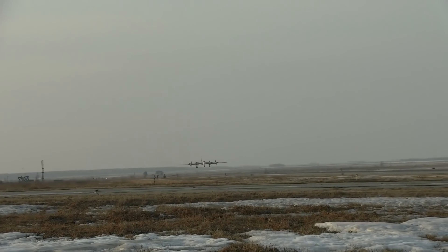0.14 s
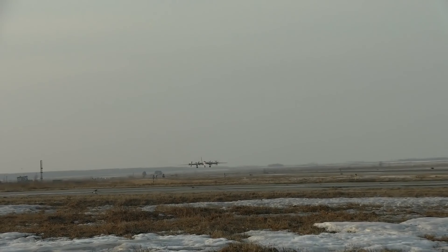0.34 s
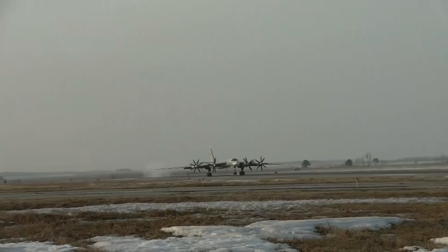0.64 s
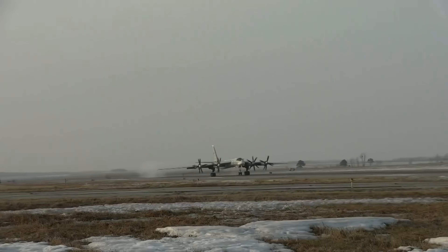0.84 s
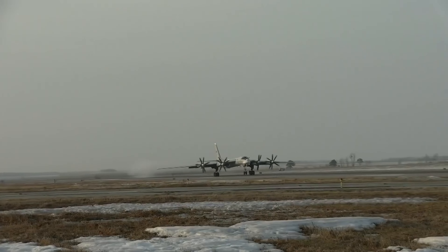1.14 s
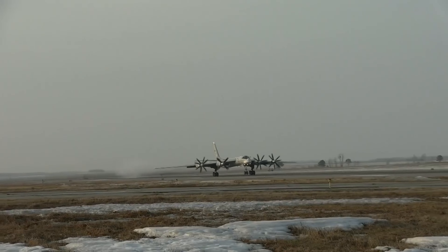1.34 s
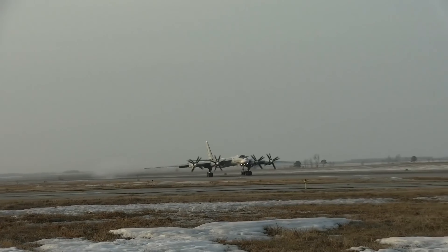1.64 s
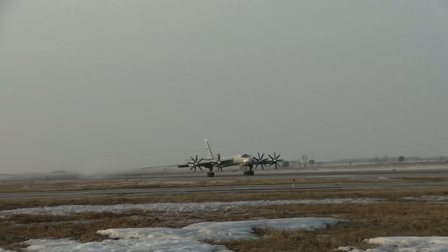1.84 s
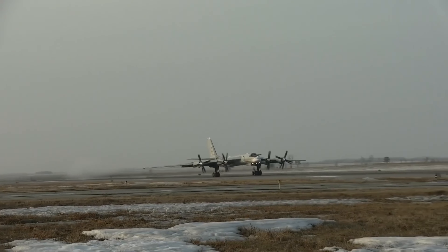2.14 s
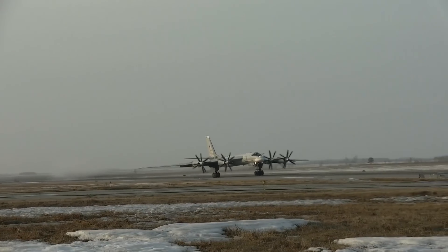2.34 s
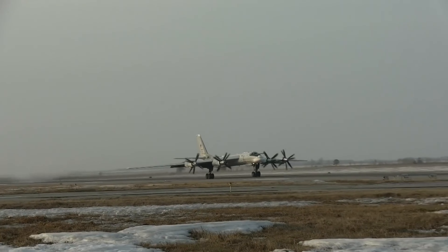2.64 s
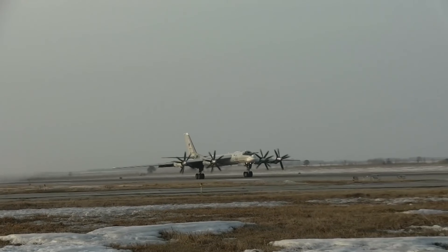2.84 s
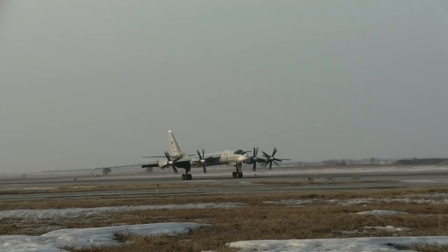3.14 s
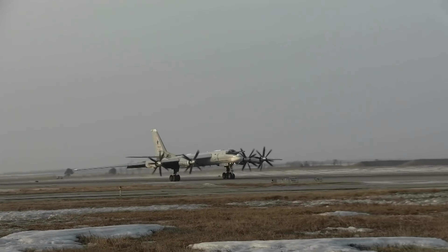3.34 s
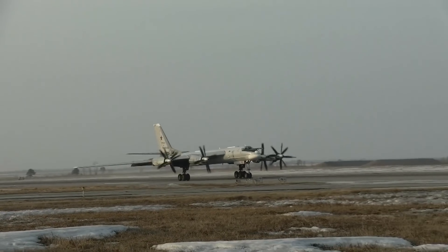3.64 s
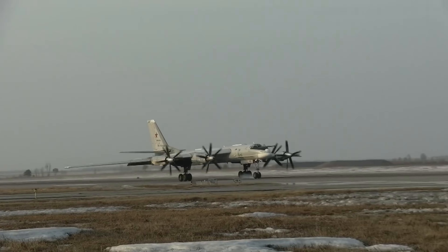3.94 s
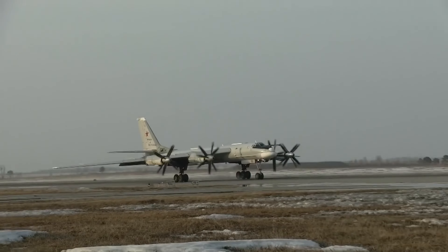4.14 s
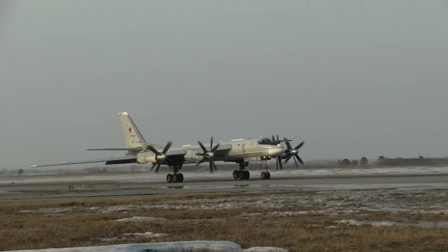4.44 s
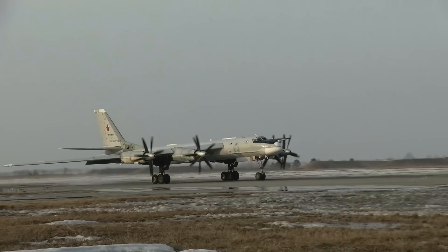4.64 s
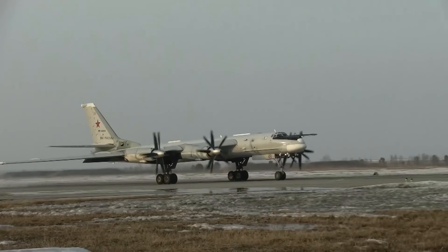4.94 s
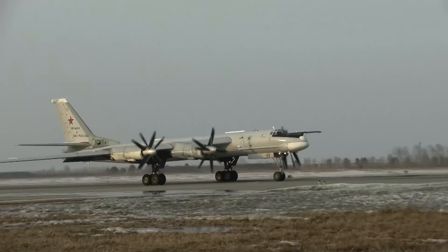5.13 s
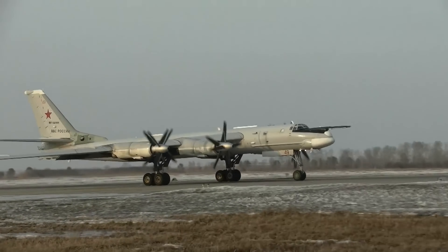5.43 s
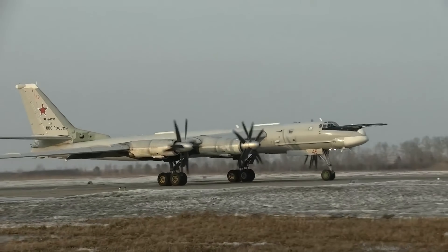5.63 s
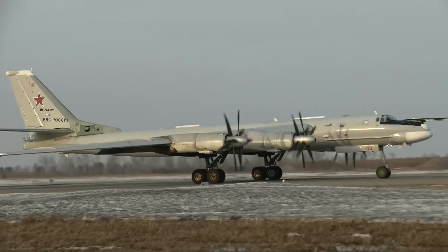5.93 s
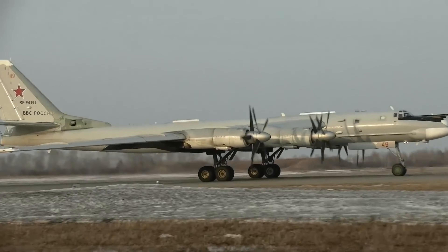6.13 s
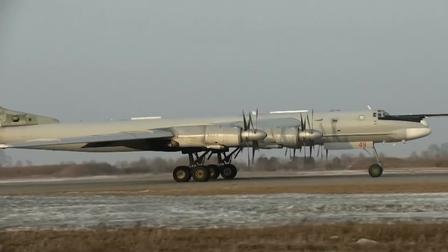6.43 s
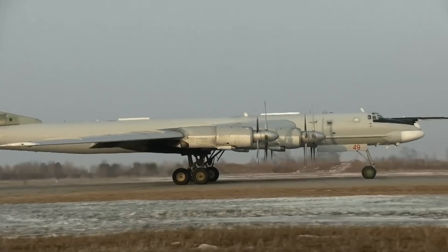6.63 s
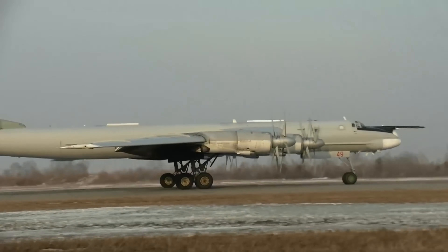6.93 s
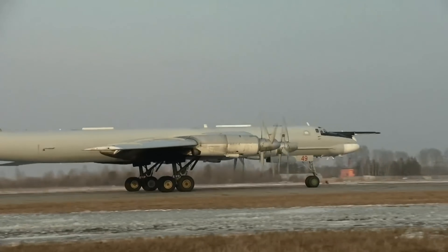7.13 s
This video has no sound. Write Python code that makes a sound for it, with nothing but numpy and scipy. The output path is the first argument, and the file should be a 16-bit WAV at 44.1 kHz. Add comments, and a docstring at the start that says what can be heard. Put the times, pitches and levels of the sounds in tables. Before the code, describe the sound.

A heavy four-propeller aircraft swells from a faint distant drone to a throbbing, roaring close pass, its pitch sinking into bright turbine hiss.

```python
"""A four-engined turboprop bomber passes over an open airfield, heard from beside the runway.
It drones far away at first; at 0.722 s the viewpoint switches to the close pass. A motor hums throughout.
Blade harmonics, sinking in pitch, beat between propellers; shaped noise makes wash, rush, hiss and exhaust.
Whistles are sines smeared by random modulation; Doppler shift, air loss and ground dips mark the passage."""
import sys
import numpy as np
from scipy import signal
from scipy.fft import rfft, irfft
from scipy.io import wavfile
from scipy.ndimage import uniform_filter1d, map_coordinates

SR = 44100
rng = np.random.default_rng(int(sys.argv[2]) if len(sys.argv) > 2 else 0)


def unload_wav(signal):
    """Save mono or channel-first audio to the path in sys.argv[1] as 16-bit WAV at rate SR, clipped to [-1, 1]."""
    wavfile.write(
        sys.argv[1],
        SR,
        np.round(np.clip(np.atleast_2d(signal).T, -1, 1) * 32767).astype(np.int16),
    )


N = 321048
T = np.arange(N) / SR
HZ = np.maximum(np.fft.rfftfreq(N, 1 / SR), 1)   # floor of 1 Hz keeps the logarithm finite


def from_db(db):
    """Logarithmic level: decibels to amplitude gain."""
    return 10 ** (np.asarray(db) / 20)


def in_time(rows, times=T):
    """Linear interpolation in time of each column of a curve."""
    s, *columns = np.transpose(rows)
    return [np.interp(times, s, column) for column in columns]


def at_hz(points, hz=HZ):
    """Linear interpolation of a spectrum on a log-frequency axis."""
    f, value = np.transpose(points)
    return np.interp(np.log(hz), np.log(f), value)


def bumps(rows):
    """Superposed resonances: bell-shaped peaks from rows of (f/Hz, width/Hz, level/dB)."""
    return sum(db * np.exp(-((HZ - hz) / width) ** 2) for hz, width, db in rows)


def beam(peak_s, width_s):
    """Directivity: a bell from 0 to 1 as a lobe of the radiation sweeps past."""
    return np.exp(-((T - peak_s) / width_s) ** 2)


def swell(peak_s, peak_db, rise_db_per_s, fall_db_per_s):
    """Exponential growth and decay: a level in dB climbs steadily to a peak and sinks after it."""
    before = np.maximum(peak_s - T, 0)
    after = np.maximum(T - peak_s, 0)
    return peak_db - rise_db_per_s * before - fall_db_per_s * after


def flutter(width_hz):
    """Random modulation: complex low-pass noise of rms 1 and the given bandwidth."""
    count = 8192
    hz = np.fft.fftfreq(count, T[-1] / count)
    white = rng.standard_normal(count) + 1j * rng.standard_normal(count)
    z = np.fft.ifft(white / (1 + (hz / width_hz) ** 2))
    return np.interp(T, np.linspace(0, T[-1], count), z / np.std(z))


def stray():
    """Phase dispersion: a harmonic starts off one sharp pulse per blade and wanders slowly."""
    scatter_rad, wander_rad = 1.1, 1.3
    return scatter_rad * rng.standard_normal() + wander_rad * flutter(width_hz=.35).real


def smeared_tone(hz, width_hz):
    """Line broadening: a complex carrier of gliding frequency widened by random modulation."""
    return flutter(width_hz) * np.exp(2j * np.pi * np.cumsum(hz) / SR)


# likeness of the left and right noise: (f/Hz, correlation)
LIKENESS = [(100, .985), (500, .993), (2000, .99), (6000, .97), (9000, .9), (12000, .55), (16000, .4)]


def noise(spectrum, band=None, peaks=(), likeness=LIKENESS):
    """Filtered noise with partial stereo coherence, of rms 1 (inside the band, if one is given)."""
    gain = from_db(at_hz(spectrum) + bumps(peaks))
    inside = 1 if band is None else (HZ > band[0]) & (HZ < band[1])
    mid, side = rfft(rng.standard_normal((2, N))) * gain / np.sqrt(np.mean(gain ** 2 * inside))
    alike = np.clip(at_hz(likeness), 0, 1)
    mid = np.sqrt((1 + alike) / 2) * mid
    side = np.sqrt((1 - alike) / 2) * side
    return irfft(mid + side * [[1], [-1]], N)


def evened(x, band):
    """Level normalization: the running rms of a band, taken from the left channel, is held near 1."""
    inside = signal.sosfilt(signal.butter(6, band, "band", fs=SR, output="sos"), x[0])
    return x / np.sqrt(uniform_filter1d(inside ** 2, size=15000))


def steady_tones(lines, waver):
    """Additive synthesis: sines from rows of (f/Hz, level/dB) that waver a little."""
    out = 0
    for hz, db in lines:
        tone = (1 + waver * flutter(width_hz=3)) * np.exp(2j * np.pi * hz * T)
        out = out + np.sqrt(2) * from_db(db) * tone.real
    return out


# drone of the distant aircraft: (f/Hz, level/dB)
FAR_TONES = [(129.5, -63), (259, -63), (388.5, -73.5), (518, -77)]
# noise around it: (f/Hz, relative density/dB)
FAR_AIR = [(30, -22), (70, -6), (140, 3), (250, 1), (400, -4), (650, 0), (1000, -3.5), (1400, -12.5),
           (1900, -4.5), (2300, -9.5), (2600, -14), (3000, -14), (3400, -10.5), (3800, -21), (5000, -25),
           (6000, -35)]


def far_aircraft():
    """Superposition of steady harmonics and broadband noise."""
    air_db = -61.5
    return steady_tones(FAR_TONES, waver=.25) + from_db(air_db) * noise(FAR_AIR)


# motor hum before the switch to the close view: (f/Hz, level/dB)
MOTOR = [(751, -64.5), (1126.6, -78), (1502, -82), (1877.6, -75), (2253, -83)]


def motor_hum(closeup):
    """A line spectrum of nearly constant tones, 3.5 dB fainter in the close view."""
    return from_db(-3.5 * closeup) * steady_tones(MOTOR, waver=.12)


def distance(times):
    """Uniform straight-line motion: metres from the microphone to the aircraft."""
    speed_m_per_s, miss_m, abeam_s = 58, 42, 6.6
    return np.hypot(speed_m_per_s * (times - abeam_s), miss_m)


def closeness():
    """Inverse-square law: squared ratio of the 42 m nearest distance to the present one."""
    return (42 / distance(T)) ** 2


# Doppler shift of the nearest engine: (t/s, frequency ratio)
DOPPLER = [(0, 1), (3.3, .99), (4, .97), (4.6, .93), (5, .87), (5.3, .82), (6, .755), (6.6, .72), (7, .695),
           (7.28, .665)]


def doppler_ratio():
    """Doppler effect: received over emitted frequency."""
    return in_time(DOPPLER)[0]


def doppler(x):
    """Doppler effect as time stretching: noise is replayed ever slower as the engine goes by."""
    position = np.cumsum(doppler_ratio())
    return np.array([map_coordinates(channel, [position], order=3, mode="mirror") for channel in x])


def through_air(x, loss_db, above_hz):
    """Atmospheric absorption above a frequency, with distance and f squared; loss in dB/(m kHz^2)."""
    hz, times, frames = signal.stft(x, SR, nperseg=512)
    excess_khz2 = np.maximum(hz[:, None] ** 2 - above_hz ** 2, 0) / 1e6
    return signal.istft(frames * from_db(-loss_db * distance(times) * excess_khz2), SR)[1][:, :N]


# Doppler-shifted blade passing rate, before smoothing: (t/s, f/Hz)
BLADE_RATE = [(0.8, 63.1), (1.39, 62.6), (1.94, 62.7), (3.56, 61.9), (4.12, 60.7), (5.75, 54.9),
              (5.8, 54.2), (6.14, 52.8), (6.28, 51.3), (6.57, 50.0), (6.83, 46.8), (6.92, 46.7),
              (7.28, 43.7)]


def blade_angle():
    """Phase is the integral of frequency; heavy propellers turn evenly, so the rate is smoothed."""
    blade_hz = uniform_filter1d(in_time(BLADE_RATE)[0], size=12000, mode="nearest")
    return 2 * np.pi * np.cumsum(blade_hz) / SR


# blade tones before beating and side lobes:
# (multiple, peak t/s, peak level/dB, rise/(dB/s), fall/(dB/s), beam level/dB, beam half-width/s)
TONES = [(1, 6.1, -57, 5, 9, 7, .35), (2, 3.33, -40.8, 1.2, 2.1, 5.1, .51),
         (3, 5.26, -31.2, 4.6, 3.4, 12.3, .67), (4, 4.76, -37.2, 1.7, 2.3, 5.7, .29),
         (5, 4.82, -28.3, 5.4, 9.8, 8.4, .69), (6, 4.9, -33.9, 2.3, 2, 18, 1.02),
         (7, 4.67, -40.2, 5.4, .3, 13, 1.3), (8, 4.72, -41.5, 7.5, 1.4, 8, .4)]
# propellers drift in and out of step:
# (multiple, second propeller against the first far off, the same abeam, [t/s of the dips])
BEATS = [(1, .4, .6, [.7, 3.2, 5.0, 6.75, 7.6]),
         (2, .35, .92, [.3, 1.8, 2.68, 4.02, 4.62, 5.32, 5.82, 6.28, 6.83, 7.27]),
         (3, .33, 1.2, [.7, 1.9, 3.07, 3.92, 4.6, 5.35, 5.95, 6.16, 6.43, 6.66, 6.98, 7.18, 7.45]),
         (4, .35, .8, [.8, 1.95, 2.55, 3.2, 3.82, 4.4, 5.21, 5.58, 5.99, 6.25, 6.45, 6.72, 6.99, 7.3]),
         (5, .42, .77, [1.05, 1.85, 2.52, 3.27, 3.68, 4.25, 5.19, 5.8, 6.07, 6.28, 6.48, 6.76, 7.3]),
         (6, .42, .87, [.6, 1.22, 1.87, 2.37, 2.73, 3.27, 3.75, 4.19, 4.84, 5.46, 5.75, 6.1, 6.48, 6.78, 7.3]),
         (7, .5, .45, [.6, 1.15, 1.9, 2.4, 3.13, 3.68, 4.22, 4.7, 5.15, 5.39, 5.77, 5.98, 6.55, 6.78, 7.3]),
         (8, .4, .7, [.6, 1.35, 1.9, 2.55, 3.3, 4.25, 4.92, 5.15, 5.38, 5.75, 6, 6.4, 6.8, 7.1, 7.4])]
# side lobes and gaps of the radiation: (multiple, peak t/s, gain level/dB, half-width/s)
SIDE_LOBES = [(2, .96, 2, .41), (2, 1.72, -8, .22), (2, 4.02, -7, .07), (2, 5.23, 4, .39), (3, 3, 6.2, .64),
              (3, 3.12, -8, .12), (3, 4.15, -3, .2), (4, 0.8, -7, .15), (4, 2.55, -8, .06),
              (4, 3.05, 3.5, .48), (4, 4.02, -5.5, .33), (4, 5.4, 3, .09), (5, 2.08, 3, .17),
              (5, 2.52, -6, .1), (5, 4.5, 2, .15), (5, 5.2, -7, .05), (5, 5.4, 4.5, .1), (6, 1.5, 4, .2),
              (6, 2.6, -5, .25), (6, 3.15, 8.5, .26), (6, 3.77, -10, .06), (6, 5.27, 2, .1),
              (6, 6.3, 4, .7), (7, 3.46, 4, .18), (7, 5.25, 4, .08), (8, 3.85, 6.5, .2)]


def blade_tones(angle):
    """Rotor harmonics with directivity: each swells in its own beam and beats between two propellers."""
    near = closeness()
    rough = .2 + .15 * near   # random wobble far off, and what closeness adds
    out = 0
    for k, (tone, beat) in enumerate(zip(TONES, BEATS), 1):
        _, peak_s, peak_db, rise, fall, beam_db, width_s = tone
        _, depth_far, depth_abeam, dips_s = beat
        lobes_db = sum(db * beam(s, width) for multiple, s, db, width in SIDE_LOBES if multiple == k)
        main_db = swell(peak_s, peak_db, rise, fall) + beam_db * (beam(peak_s, width_s) - 1)
        level = from_db(main_db + lobes_db)
        cycles = np.interp(T, dips_s, np.arange(len(dips_s)))   # one beat from dip to dip
        depth = depth_far + (depth_abeam - depth_far) * near
        pair = 1 - depth * np.exp(2j * np.pi * cycles)
        out = out + level * (pair + rough * flutter(width_hz=5)) * np.exp(1j * (k * angle + stray()))
    return -np.sqrt(2) * out.real


# propeller wash before its split into tones and noise: (t/s, level/dB)
WASH_LEVEL = [(.74, -58), (1.6, -56.5), (3.4, -51), (3.95, -48), (4.5, -36.5), (5.0, -32), (5.5, -35.5),
              (6.15, -39.5), (6.6, -43.5), (7.28, -50.5)]


def wash_level_db():
    """Level envelope shared by the tonal and random wash."""
    return in_time(WASH_LEVEL)[0]


def tonal_share():
    """Energy partition: share of the wash in blade harmonics, greatest ahead of the propellers."""
    return np.clip(.1 + .53 * beam(peak_s=4.7, width_s=.9), 0, 1)


# weaker tones against the tonal wash: (multiple, level/dB)
OVERTONES = [(9, -8), (10, -7), (11, -6), (12, -5), (13, -4.5), (14, -7), (16, -16), (20, -23)]


def wash_harmonics(angle):
    """A harmonic comb; the engines' pitches part and random modulation smears it."""
    comb = from_db(wash_level_db()) * np.sqrt(tonal_share())
    blur_from_s, blur_full_s = 4.85, 5.9
    blur = np.clip((T - blur_from_s) / (blur_full_s - blur_from_s), 0, 1)
    out = 0
    for k in range(len(TONES) + 1, 21):
        level = comb * from_db(np.interp(k, *np.transpose(OVERTONES)))
        clear = .78 + .62 * flutter(width_hz=4)
        waver = np.sqrt(1 - blur) * clear + np.sqrt(blur) * flutter(width_hz=11)
        out = out + level * waver * np.exp(1j * (k * angle + stray()))
    return -np.sqrt(2) * out.real


# random part of the wash: (f/Hz, relative density/dB)
WASH = [(25, -55), (60, -28), (220, -6), (380, 1), (520, 0), (680, 1.5), (850, 0), (1020, -2), (1300, -5),
        (2500, -35), (8000, -75)]


def wash_noise():
    """Turbulent broadband noise, Doppler-shifted and holding the energy left by the harmonics."""
    wash = evened(doppler(noise(WASH)), (550, 1000))
    return from_db(wash_level_db() - 1.8) * np.sqrt(1 - tonal_share()) * wash


# low rumble: (f/Hz, relative density/dB)
RUMBLE = [(25, -42), (45, -21), (70, -8), (100, -1.5), (160, 5), (230, -.5), (330, -2), (450, -10),
          (700, -24), (1500, -53), (6000, -85)]


def rumble():
    """Directional low-frequency noise that swells as the propellers turn broadside."""
    level_db = swell(peak_s=5, peak_db=-55.5, rise_db_per_s=2.2, fall_db_per_s=2.5)
    level_db = level_db + 5 * beam(peak_s=5, width_s=.45)
    return from_db(level_db) * noise(RUMBLE, (65, 105))


def blade_chop(angle):
    """Amplitude modulation: counter-rotating blades pulse the noise at twice the blade rate."""
    return 1 + .06 * np.cos(2 * angle + stray())


# engine rush: (f/Hz, relative density/dB)
RUSH = [(60, -55), (400, -19), (650, -15), (900, -11.3), (1200, -8), (1550, -4.2), (1800, -3.6), (2250, -3),
        (3000, -3), (4000, -3.5), (5200, -3.5), (6200, -9), (7000, -24), (9000, -55)]
# blurred compressor whines in the rush, before Doppler shift: (f/Hz, width/Hz, level/dB)
COMPRESSORS = [(2560, 180, 2.7), (3400, 240, 3), (4600, 330, 3.8), (5500, 500, 1.8)]
# rush before flutter: (t/s, level/dB)
RUSH_LEVEL = [(.74, -57), (1.6, -53.3), (3.4, -44), (4.0, -38.4), (4.7, -33.9), (5.2, -29.5), (5.95, -26.5),
              (6.55, -27.8), (7.28, -28.5)]


def engine_rush():
    """Resonantly coloured noise under Doppler shift, air absorption and random level modulation."""
    rush = doppler(noise(RUSH, peaks=COMPRESSORS))
    rush = evened(through_air(rush, loss_db=.0047, above_hz=1000), (1200, 2800))
    level_db = in_time(RUSH_LEVEL)[0] + .1 + .4 * flutter(width_hz=25).real
    return from_db(level_db) * rush


# compressor-stage whistles, before Doppler shift and flicker:
# (f/Hz, width/Hz, peak t/s, peak level/dB, rise/(dB/s), fall/(dB/s))
STAGE_WHISTLES = [(2050, 70, 1.9, -62, 7, 9), (2690, 100, 3.1, -55.5, 10, 8), (3480, 100, 3.3, -58, 9, 14),
                  (3330, 120, 5.85, -37, 14, 14), (2480, 90, 6.8, -39, 10, 2)]


def stage_whistles():
    """Narrow-band radiation from later compressor stages, each swelling at its own angle."""
    out = 0
    for hz, width_hz, peak_s, peak_db, rise, fall in STAGE_WHISTLES:
        level = from_db(swell(peak_s, peak_db, rise, fall) + 2.5 * flutter(width_hz=5).real)
        out = out + level * smeared_tone(hz * doppler_ratio(), width_hz)
    return np.sqrt(2) * out.real


# surges of the intake whistle: (peak t/s, gain level/dB, half-width/s)
INTAKE_SURGES = [(2.25, 6, .14), (2.85, 5.5, .22), (3.85, 4.5, .15), (4.54, 9, .09), (5.3, 8, .22)]


def intake_whine():
    """Forward directivity: the first compressor stage whistles from the intakes until they turn away."""
    level_db = swell(peak_s=4.5, peak_db=-47, rise_db_per_s=11, fall_db_per_s=12)
    level_db = level_db + sum(db * beam(s, width) for s, db, width in INTAKE_SURGES)
    emitted_hz = 4600
    return np.sqrt(2) * from_db(level_db) * smeared_tone(emitted_hz * doppler_ratio(), width_hz=150).real


# turbine hiss: (f/Hz, relative density/dB)
HISS = [(2500, -35), (3600, -14), (4100, -7), (4700, -6), (5300, 0.5), (6300, 1), (6650, -3), (7000, -15),
        (7500, -12.5), (8400, -12.5), (9000, -16.5), (10200, -16), (11000, -26.5), (13000, -27),
        (15500, -25), (17000, -38)]
# hiss before flutter and air loss: (t/s, level/dB)
HISS_LEVEL = [(.74, -90), (2, -75), (3, -64.5), (3.56, -60), (4.45, -42.5), (5.07, -39), (5.22, -33),
              (6.3, -32.5), (6.75, -30), (7.28, -29)]


def turbine_hiss():
    """High-frequency noise under atmospheric absorption and random level modulation."""
    hiss = through_air(noise(HISS, (5000, 6700)), loss_db=.0017, above_hz=4800)
    level_db = in_time(HISS_LEVEL)[0] + .9 * flutter(width_hz=22).real
    return from_db(level_db) * hiss


# exhaust roar: (f/Hz, relative density/dB)
EXHAUST = [(120, -25), (260, -8), (330, -1), (440, 0), (560, -2.5), (680, -10.5), (900, -18), (2000, -45)]
# its gusts: (t/s, level/dB)
EXHAUST_LEVEL = [(4.6, -75), (5.3, -53), (5.7, -41.5), (6.05, -39.5), (6.42, -42), (6.57, -50), (6.72, -44),
                 (6.92, -42), (7.28, -50)]


def exhaust_roar():
    """Jet-noise directivity: the roar rises once the nozzles turn towards the microphone."""
    return from_db(in_time(EXHAUST_LEVEL)[0]) * noise(EXHAUST)


def turbine_whine():
    """A broadened spectral line that opens up as the engines come abeam."""
    level_db = swell(peak_s=6.85, peak_db=-29, rise_db_per_s=15, fall_db_per_s=.3)
    heard_hz, = in_time([(5.5, 6350), (6.9, 6300), (7.28, 6120)])
    return np.sqrt(2) * from_db(level_db) * smeared_tone(heard_hz, width_hz=260).real


# sliding bands hollowed by uneven ground: (width/octaves, [(t/s, f/Hz, depth level/dB)])
GROUND_DIPS = [(.3, [(3.2, 1300, 0), (4.4, 1160, 5), (4.85, 1100, 1.5), (5.2, 1080, 3.5), (6.1, 930, 5.5),
               (7.28, 900, 4.5)]), (.07, [(.75, 2300, 1.5), (1.5, 2290, 4), (2.8, 2260, 5.5),
               (4.1, 2200, 4.5), (4.8, 2180, 2), (5.2, 2200, 2.3), (5.6, 2220, 4), (6.5, 2200, 4.5),
               (7.28, 2120, 1)]), (.055, [(.75, 3130, 1.5), (1.4, 3110, 4), (2.7, 3060, 4.5),
               (3.7, 2960, 5), (4.55, 2850, 6.5), (4.8, 2820, 0)]), (.055, [(4.4, 3350, 0), (4.8, 3230, 8),
               (5.2, 3070, 9), (5.6, 2990, 9), (5.95, 3110, 7.5), (6.3, 3090, 6), (6.6, 3050, 4.5),
               (7, 3050, 10), (7.28, 3050, 11)]), (.07, [(3.8, 4950, 0), (4.5, 4780, 1), (5.2, 4700, 1),
               (6.6, 4550, 0), (7.28, 4620, 3)]), (.14, [(5.9, 1470, 0), (6.7, 1420, 3.2),
               (7.28, 1380, 3.8)])]


def over_ground(x):
    """Destructive interference: ground reflections cancel bands of the direct sound."""
    hz, times, frames = signal.stft(x, SR, nperseg=1024)
    loss_db = 0
    for width_octaves, path in GROUND_DIPS:
        dip_hz, depth_db = in_time(path, times)
        octaves = np.log2(np.maximum(hz[:, None], 1) / dip_hz)
        loss_db = loss_db + depth_db * np.exp(-(octaves / width_octaves) ** 2)
    return signal.istft(frames * from_db(-loss_db), SR)[1][:, :N]


def near_aircraft():
    """Superposition of blade tones, ground-filtered turbulence and turbine whistles."""
    angle = blade_angle()
    turbulence = wash_noise() + rumble() + exhaust_roar()
    turbulence = turbulence + (engine_rush() + turbine_hiss()) * blade_chop(angle)
    tones = blade_tones(angle) + wash_harmonics(angle)
    whistles = stage_whistles() + intake_whine() + turbine_whine()
    return tones + over_ground(turbulence) + whistles


def scene():
    """Linear crossfade in 4 ms from the distant aircraft to the close pass, over the motor hum."""
    closeup = np.clip((T - .722) / .004, 0, 1)
    return (1 - closeup) * far_aircraft() + closeup * near_aircraft() + motor_hum(closeup)


# resonances and notches of the microphone housing: (f/Hz, width/Hz, left level/dB, right level/dB)
HOUSING = [(250, 450, .6, -.6), (1150, 400, .7, -1.8), (1900, 450, 3, -3), (2560, 200, 1.2, 1.2),
           (3300, 500, 1.5, -1.5), (4450, 260, 1, -6), (5750, 200, -1.5, 1.5), (6800, 170, -4.5, 3.5),
           (7380, 190, -11.5, 3.5), (7880, 160, 0, -7)]
# phase of the capsules, shared half and half: (f/Hz, left lead/rad)
CAPSULE_LEAD = [(30, .12), (120, .21), (200, .2), (270, .1), (650, .19), (950, .01), (3800, .05),
                (4550, .7), (5200, -.05), (8000, .05)]


def through_housing(x):
    """Linear filtering by convolution: housing resonances and capsule phase colour each channel."""
    housing = np.array(HOUSING)
    left, right = housing[:, :3], np.delete(housing, 2, axis=1)
    colour = from_db([bumps(left), bumps(right)])
    colour = colour * np.exp(.5j * at_hz(CAPSULE_LEAD) * [[1], [-1]])
    response = np.roll(irfft(colour, N), 512, axis=1)[:, :1025] * np.hanning(1025)
    return signal.fftconvolve(x, response, "same", axes=1)


# faint top that follows the treble: (f/Hz, relative density/dB)
FIZZ = [(3000, -10), (9000, 0), (14800, -1), (16000, -10)]


def fizz(heard):
    """Envelope following: noise 44 dB below the running loudness of the left treble."""
    treble = signal.sosfilt(signal.butter(2, 2200, "high", fs=SR, output="sos"), heard[0])
    loudness = np.sqrt(uniform_filter1d(treble ** 2, size=8000))
    return from_db(-44) * loudness * noise(FIZZ)


# preamplifier hiss: (f/Hz, relative density/dB)
MIC_HISS = [(100, -4), (3000, -1), (4800, 1), (7000, -1), (10000, -3.5), (14000, -9), (16000, -18)]


def record(dry):
    """Transducer chain: housing and capsules, added noise, then a low-pass filter at 16 kHz."""
    heard = through_housing(dry)
    heard = heard + fizz(heard)
    heard = heard + from_db(-73) * noise(MIC_HISS, likeness=[(100, .3), (16000, .3)])
    return signal.sosfilt(signal.ellip(10, .1, 80, 16000, fs=SR, output="sos"), heard)


dry = scene()
out = record(dry)
unload_wav(out)
```